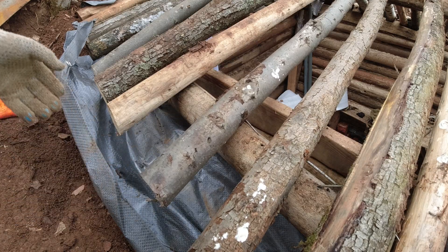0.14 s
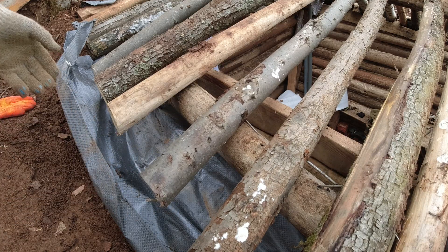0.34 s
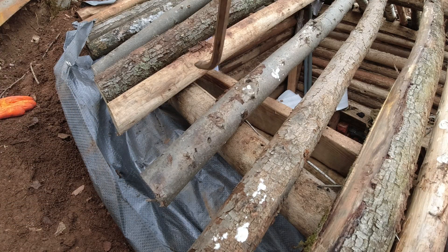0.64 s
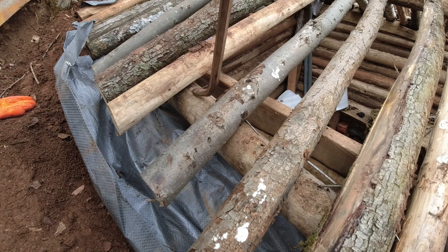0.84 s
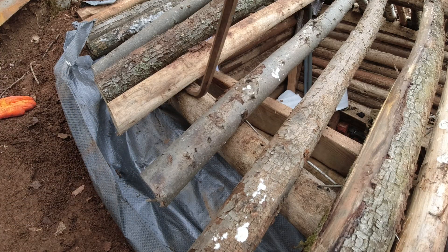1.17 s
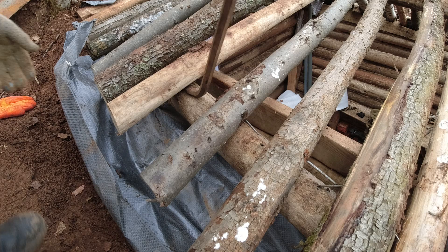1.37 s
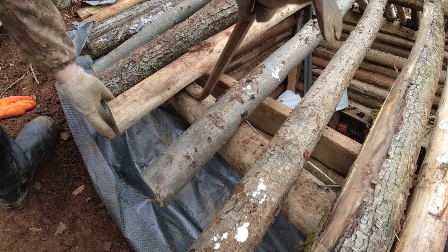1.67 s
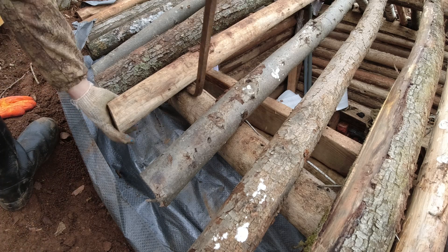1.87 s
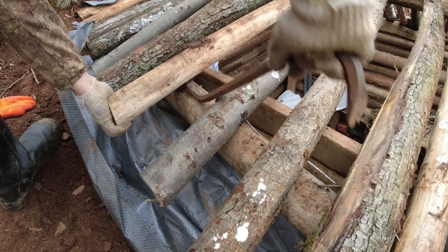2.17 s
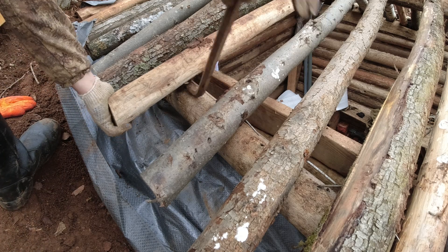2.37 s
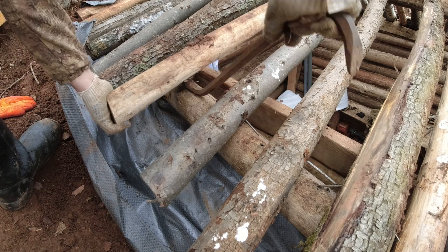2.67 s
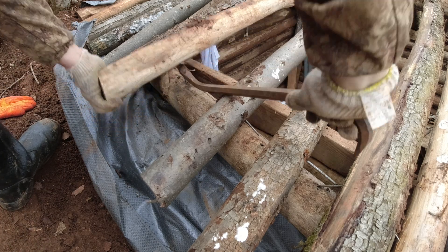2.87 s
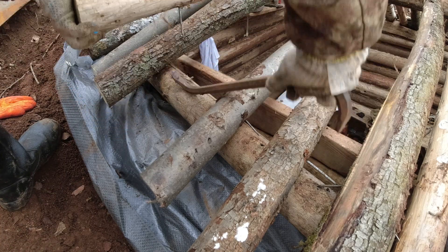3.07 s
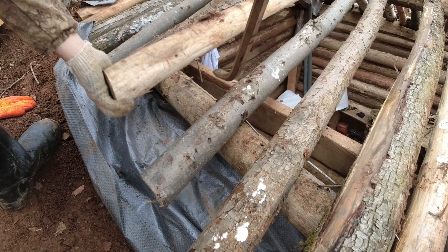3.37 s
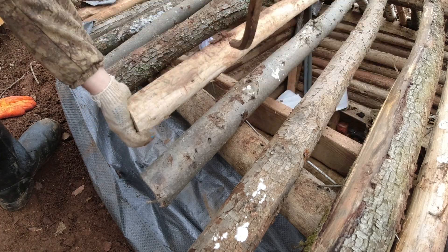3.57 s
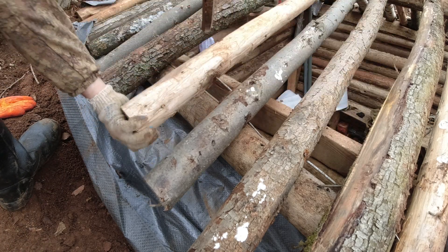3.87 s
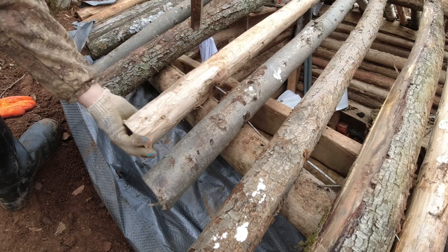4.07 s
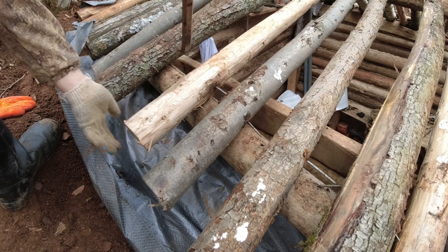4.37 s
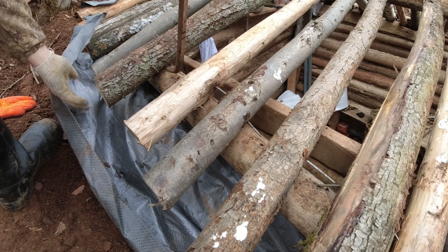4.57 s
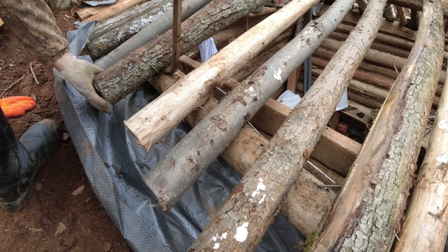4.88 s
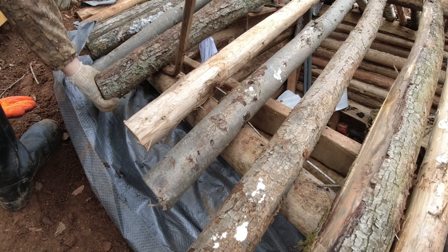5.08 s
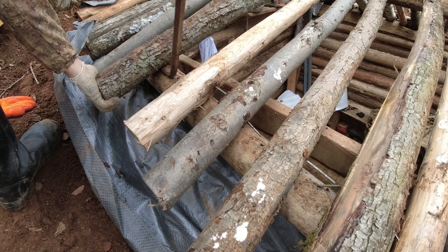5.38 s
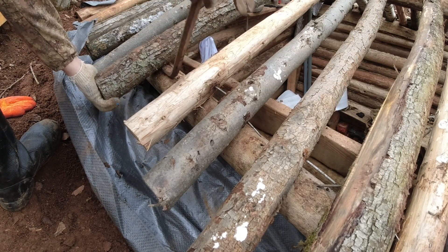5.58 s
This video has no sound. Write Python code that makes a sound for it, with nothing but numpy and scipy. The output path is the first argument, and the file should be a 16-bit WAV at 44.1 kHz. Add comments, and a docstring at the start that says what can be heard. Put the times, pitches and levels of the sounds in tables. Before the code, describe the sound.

A steel crowbar scrapes into a log frame, wood fibres crack sharply, a pole breaks loose, knocks on logs and is laid down with rustling.

```python
"""Outdoors at a log frame, close to a small microphone: a steel crowbar levers a wooden pole off.
The claw scrapes in, fibres crack, the pole breaks loose, knocks on the logs and is laid down.
Wood and steel ring as decaying modes; fibres snap as runs of tiny breaks; sliding is filtered grit.
Boots thud on the soil as low decaying sines; gloves, bark and a plastic tarp rustle; faint hiss lies below."""
import sys
import numpy as np
from scipy import signal
from scipy.io import wavfile
from scipy.ndimage import uniform_filter1d

SR = 44100
rng = np.random.default_rng(int(sys.argv[2]) if len(sys.argv) > 2 else 0)


def transcribe(signal):
    """Save signal, clipped to [-1, 1], as a 16-bit WAV file at the path in sys.argv[1]."""
    frames = np.atleast_2d(signal).T
    limited = np.clip(frames, -1, 1)
    pcm = np.round(limited * 32767).astype(np.int16)
    wavfile.write(sys.argv[1], SR, pcm)


N = 252693
TIME = np.arange(N) / SR
HIT = np.arange(16384) / SR  # time axis of one event [s]
HIT_HZ = np.fft.rfftfreq(len(HIT), 1 / SR)


def amp(db):
    """Decibels to gain."""
    return 10 ** (np.asarray(db) / 20)


def evened(x):
    """Scales to rms 1."""
    return x / np.sqrt(np.mean(x ** 2) + 1e-20)


def blow(x):
    """Scales to the energy of 10 ms at rms 1."""
    return x / np.sqrt(np.sum(x ** 2) / (SR / 100) + 1e-20)


def shape(points, hz):
    """Gain of a spectrum table at the given frequencies, interpolated over log frequency."""
    point_hz, db = np.transpose(points)
    return amp(np.interp(np.log(hz + 1), np.log(point_hz), db))


def causal(x, gain):
    """Filters by a gain curve with minimum phase, so that nothing comes before an attack."""
    both_sides = np.r_[gain, gain[-2:0:-1]]
    log_gain = np.log(np.maximum(both_sides, 1e-5))
    spectrum = np.exp(np.conj(signal.hilbert(log_gain)))
    taps = np.fft.ifft(spectrum).real[:4096]
    return signal.fftconvolve(x, taps)[:len(x)]


def colour(x, points):
    """Filters x by a spectrum table."""
    return causal(x, shape(points, HIT_HZ))


def add(mix, s, sound):
    """Adds a sound at time s, in place."""
    part = mix[max(round(s * SR), 0):][:len(sound)]
    part += sound[:len(part)]


def swell(start, length, rise_s, fall_db_per_s):
    """Envelope of one effort: it builds, holds to the end of its length and dies away."""
    rise = np.clip((TIME - start) / rise_s, 0, 1)
    return rise * amp(-fall_db_per_s * np.maximum(TIME - start - length, 0))


def scatter(t60_s, slope):
    """Dense random ringing; t60 holds up to 1 kHz and shortens toward the treble."""
    hz, t, cells = signal.stft(rng.choice([-1., 1.], len(HIT)), SR, nperseg=128)
    life_s = t60_s / np.maximum(hz[:, None] / 1000, 1) ** slope
    return signal.istft(cells * amp(-60 * t / life_s), SR, nperseg=128)[1][:len(HIT)]


def ring(modes, weight, freedom):
    """Sum of decaying sines, each of random sign as the point of contact sets it."""
    hz, db, t60_s = np.transpose(modes)[:, :, None]
    sign = rng.choice([-1, 1], hz.shape)
    envelope = amp(db - 60 * HIT / (t60_s * freedom))
    return (sign * weight(hz) * envelope * np.sin(2 * np.pi * hz * HIT)).sum(0)


def grit(grains_per_s, spread_db, count=30):
    """Tiny slips of uneven size, each ringing a few cycles at the pitch of its own spot."""
    out, t = np.zeros(N), HIT[:600]
    for hz in np.geomspace(300, 14000, count):
        size = amp(spread_db * np.minimum(rng.exponential(1, N), 3))
        slips = size * (rng.random(N) < grains_per_s / count / SR)
        spot = np.cos(2 * np.pi * hz * t) * np.exp(-t * hz / rng.uniform(1, 3))
        out += signal.oaconvolve(slips, np.sqrt(hz) * blow(spot))[:N]
    return evened(out)


# blows on timber: (time [s], level [dB], bass edge [Hz], hardness [Hz], pole level before trim [dB])
TIMBER_BLOWS = [(0.879, -37, 69, 670, -14), (1.043, -41, 149, 856, -9), (1.12, -32.5, 191, 1510, -6),
                (1.227, -23.5, 60, 460, -14), (1.234, -26.5, 450, 830, -5), (1.481, -44.5, 200, 560, -27),
                (1.8184, -23, 364, 1600, -3.5), (2.2566, -16.5, 587, 1980, -3),
                (2.5676, -16.5, 450, 1290, -8), (2.741, -24.5, 270, 1160, -1), (2.934, -39, 199, 475, -9.5),
                (3.2127, -19.5, 330, 780, -0.5), (3.2436, -25, 470, 580, 4), (3.695, -41, 218.3, 748, 17),
                (3.799, -54.5, 303, 722, -1), (4.013, -36.5, 245, 915, -3), (4.1117, -18.5, 100, 756, -5.5),
                (4.154, -35.5, 300, 900, -2), (4.184, -26, 180, 870, -2.5), (4.196, -31, 300, 990, 2),
                (4.223, -31, 296, 680, 5), (4.432, -39, 654, 950, -9), (4.7876, -23, 150.3, 820, -6),
                (4.897, -41, 198, 990, -11), (5.034, -37.5, 79, 820, -6.5)]
# pole modes: (frequency [Hz], relative level [dB], t60 before freedom [s])
POLE_MODES = [(260.7, -14, 0.3), (362, -15, 0.06), (385, -12.5, 0.13), (418.7, -9, 0.079),
              (448.3, -5.5, 0.18), (586.3, -0.5, 0.096), (668, -11.5, 0.085), (760.5, -3, 0.095),
              (886, -14.5, .11), (978, -6.5, 0.18), (1267, -8, 0.13), (1410, -14.5, 0.11), (2380, 2, 0.067),
              (2953, -11, .05)]
# timber spectrum: (frequency [Hz], gain [dB])
TIMBER_SPECTRUM = [(100, 8), (550, -4.5), (1000, -1), (1700, -3.5), (2200, -1.5), (2700, -2), (3500, -1),
                   (5000, 0.5), (9000, -11.5), (15000, 3.5)]
# hold on the pole: pinned to the frame, loose on the claw, swinging free in the glove, laid on the logs:
# (from time [s], stack t60 up to 1 kHz [s], pole freedom [factor on t60])
POLE_SUPPORT = [(0, .155, 1.17), (2.65, 0.1, 0.68), (3.45, 0.11, 1.27), (4.35, 0.25, 0.78)]


def knocks(push_db=-3, clatter_db=-2, pole_trim_db=2, slope=0.28, steepness=1.97):
    """A blow is a push, log-stack clatter and pole ring; soft contact takes away the treble."""
    out = np.zeros(N)
    for s, db, bass_hz, hard_hz, pole_db in TIMBER_BLOWS:
        _, stack_t60_s, freedom = POLE_SUPPORT[sum(s > row[0] for row in POLE_SUPPORT[1:])]

        def contact(hz):
            """Bass cut below bass_hz, softness above hard_hz."""
            bass_cut = hz ** 2 / np.hypot(hz ** 2, bass_hz ** 2)
            return bass_cut / np.hypot(1, (hz / hard_hz) ** steepness)

        gain = contact(HIT_HZ) * shape(TIMBER_SPECTRUM, HIT_HZ)
        push = amp(push_db) * blow(causal(signal.unit_impulse(len(HIT)), gain))
        clatter = amp(clatter_db) * blow(causal(scatter(stack_t60_s, slope), gain))
        pole = amp(pole_db + pole_trim_db) * blow(ring(POLE_MODES, contact, freedom))
        add(out, s, amp(db) * blow(push + clatter + pole))
    return out


# crackle spells, as grit shifts, strained fibres settle and bark crumbles: (start [s], length [s],
# rate [snaps/s], first and last snap level before scatter and trim [dB], treble re snap before trim [dB])
CRACKLE_SPELLS = [(0.111, 0.11, 72, -44, -46, -24), (1.902, 0.21, 48, -35.5, -53, -11.5),
                  (4.261, 0.28, 80, -35, -38.5, -30), (4.601, .4, 42, -43, -43.5, -34),
                  (5.101, 0.15, 26.3, -48.5, -44, -22)]
# range of note [Hz]
CRACKLE_NOTE_RANGE_HZ = (1250, 3170)
CRACKLE_SCATTER_DB, CRACKLE_T60_S = 9, 0.02


def crackling(count=40):
    """Faint snaps at random gaps through each spell, as rows like those of CLEAR_CRACKS."""
    rows = []
    for start, length, per_s, first_db, last_db, treble_db in CRACKLE_SPELLS:
        after = np.cumsum(rng.exponential(1, count)) / per_s
        trend_db = np.interp(after, [0, length], [first_db, last_db])
        snap_db = trend_db + CRACKLE_SCATTER_DB * rng.uniform(-1.08, 1, count)
        notes_hz = rng.uniform(*CRACKLE_NOTE_RANGE_HZ, count)
        for s, db, hz in zip(after, snap_db, notes_hz):
            if s < length:
                rows.append((start + s, db, db + treble_db, hz, CRACKLE_T60_S))
    return rows


# clearest snaps of fibres and bark: (time before delay [s], snap level before trim [dB],
# treble level before trim [dB], note of the snapping piece [Hz], snap t60 [s])
CLEAR_CRACKS = [(1.1191, -20, -71, 1840, 0.02), (1.398, -23.5, -48, 3780, 0.049),
                (1.4071, -25.5, -44.5, 1330, 0.12), (1.4454, -32.5, -72, 1310, 0.033),
                (1.7506, -16, -30.5, 4360, 0.035), (1.7637, -22.5, -41, 1360, 0.043),
                (1.7727, -20, -35, 3800, 0.036), (1.7776, -18, -44, 2120, 0.026),
                (1.785, -19.5, -39, 2080, 0.075), (1.804, -14, -37, 1450, 0.023),
                (1.8175, -10.5, -29.5, 1490, 0.034), (1.8349, -20, -34, 1390, .015),
                (1.8555, -13, -30.5, 2780, 0.045), (1.87, -14, -32.5, 2670, 0.06),
                (1.883, -17, -33.5, 2090, 0.021), (2.0064, -55, -39.5, 3350, 0.011),
                (2.179, -34, -48.5, 1370, 0.1), (2.2254, -16, -33, 2140, 0.027),
                (2.2399, -18, -38, 2960, 0.044), (2.2544, -4, -25.5, 2020, 0.013),
                (2.3438, -24.5, -41, 2880, 0.058), (2.3617, -41, -50, 1320, 0.025),
                (2.57, -14.5, -37, 1860, 0.078), (2.9416, -34, -44.5, 1260, .02),
                (3.021, -27.5, -64, 2220, 0.1), (3.0855, -19.5, -37, 2800, 0.034),
                (3.3146, -45.5, -87, 2500, .03), (3.5233, -37, -64, 2160, 0.012),
                (3.6025, -41.5, -57, 3300, .02), (3.6599, -24, -38.5, 3150, 0.023),
                (3.6675, -26, -44, 2870, 0.034), (3.687, -28, -49.5, 2650, 0.12),
                (3.8122, -37.5, -75, 2265, 0.034), (3.9353, -38.5, -83, 1560, 0.023),
                (3.9787, -29, -60, 2260, .06), (4.264, -42, -46, 1610, .01),
                (4.2973, -24.5, -55, 1210, 0.024), (4.334, -30, -63, 2850, .025),
                (4.465, -35, -76, 2170, 0.031), (4.6, -24, -46, 3020, 0.0089),
                (4.71, -32, -81, 2070, 0.057), (4.9763, -36, -77, 1960, 0.022),
                (5.3663, -37.5, -64, 1500, .011), (5.5414, -33.5, -56.5, 2310, 0.045)]
# spectra of snap and treble fizz: (frequency [Hz], gain [dB])
SNAP_SPECTRUM = [(100, -31), (500, -4.5), (1200, -2.5), (2200, -4.5), (3500, -3), (5500, -5), (8000, -22),
                 (16000, -37.5)]
FIZZ_SPECTRUM = [(1000, -42), (4000, -26.5), (6500, 10), (9000, 14.5), (16000, 4.5)]


def cracks(snap_trim_db=-12, fizz_trim_db=-1, grain_db=3, tail_db=-27, tail_t60_s=0.12,
           fizz_life=0.47, note_db=7, sharpness=5, delay_s=.0008, count=140):
    """A fibre tears in a quick run of tiny breaks that ring the loose piece; the treble dies first."""
    out, t = np.zeros(N), HIT[:4096]
    snap_gain, fizz_gain = shape(SNAP_SPECTRUM, HIT_HZ), shape(FIZZ_SPECTRUM, HIT_HZ)

    def fade(life_s):
        """Fast decay over a weak tail."""
        return amp(-60 * t / max(life_s, .003)) + amp(tail_db - 60 * t / tail_t60_s)

    sizes = amp(grain_db * np.minimum(rng.standard_normal((count, len(t))), 2))
    runs = sizes * rng.choice([-1, 1], (count, len(t)))
    for (s, snap_db, treble_db, note_hz, t60_s), breaks in zip(list(CLEAR_CRACKS) + crackling(), runs):
        snap = causal(breaks * fade(t60_s), snap_gain)
        note = signal.lfilter(*signal.iirpeak(note_hz, sharpness, SR), snap)
        snap = amp(snap_db + snap_trim_db) * blow(snap + amp(note_db) * note)
        fizz = causal(breaks * fade(t60_s * fizz_life), fizz_gain)
        fizz = amp(treble_db + fizz_trim_db) * blow(fizz)
        add(out, s + delay_s, snap + fizz)
    return out


# blows on the crowbar: (time [s], level [dB], frequency excited most [Hz], spread [octaves],
# freedom to ring [factor on t60])
BAR_BLOWS = [(.897, -42.5, 2050, 0.61, 1), (1.121, -41, 2060, 0.95, 0.66), (1.857, -30, 4550, 1.15, 0.16),
             (2.256, -29, 2100, 1.9, 0.45), (2.568, -12.5, 870, 1.3, 0.47), (2.571, -18, 1983, 1.2, 0.36),
             (2.741, -31, 760, 0.48, 0.41), (3.084, -30, 5660, 1.23, 0.58), (3.085, -34, 2460, 0.31, 0.94),
             (3.213, -30, 606, 0.39, 0.94)]
# crowbar modes: (frequency [Hz], relative level [dB], t60 before freedom [s])
BAR_MODES = [(685, -17, .4), (715, 0, .34), (995, 0, .22), (1147, -18, .34), (1260, -2, .22),
             (1595, -9, .18), (1878, 0, .22), (2837, -14, .22), (3424, -7, .1), (4006, -6, .15),
             (4657, -9, .09), (5476, -2, .12), (6578, -6, .1), (7890, -4, .12), (9500, -12, .1),
             (12400, -15, .1)]


def crowbar(rise_s=0.0017):
    """Bending modes of the steel, damped by the glove and by the wood that it leans on."""
    out = np.zeros(N)
    for s, db, centre_hz, octaves, freedom in BAR_BLOWS:
        def contact(hz):
            """Weight falling away on both sides of centre_hz."""
            return 1 / (1 + (np.log2(hz / centre_hz) / octaves) ** 2) ** 1.28

        steel = ring(BAR_MODES, contact, freedom) * (1 - np.exp(-HIT / rise_s))
        add(out, s, amp(db) * blow(steel))
    return out


# gritty shoves of claw, pole or boot: (start [s], length [s], peak level [dB], centre [Hz])
GRITTY_SHOVES = [(0.099, 0.072, -49, 690), (0.172, 0.027, -48.5, 1100), (1.063, 0.085, -37, 2650),
                 (1.341, 0.036, -34.5, 1200), (1.715, 0.043, -44.5, 463), (2.195, 0.038, -48.5, 2800),
                 (2.31, 0.064, -41.5, 894), (2.664, 0.039, -45.5, 930), (2.713, 0.052, -42, 627),
                 (3.01, 0.027, -42.5, 5000), (3.981, 0.045, -45.5, 2120), (4.286, 0.091, -45.5, 1800),
                 (4.607, 0.059, -42.5, 2320), (5.297, 0.031, -48.5, 1200)]
SHOVE_OCTAVES = 1.2


def shoves(crest=0.64):
    """Friction builds until the crest, a fraction of the length, then falls to nothing."""
    out, drive = np.zeros(N), grit(grains_per_s=2100, spread_db=-0.5)
    for s, length, db, centre_hz in GRITTY_SHOVES:
        band = 1 / (1 + (np.log2((HIT_HZ + 1) / centre_hz) / SHOVE_OCTAVES) ** 2) ** 1.97
        rasp = evened(causal(drive[round(s * SR):][:len(HIT)], band))
        effort = np.interp(HIT, [0, length * crest, length], [.15, 1, 0])
        add(out, s, amp(db) * rasp * effort)
    return out


# spectra of wood body and surface rasp: (frequency [Hz], gain [dB])
BODY_SPECTRUM = [(80, -17.5), (220, -1), (500, 2), (1200, -1.5), (1800, -7), (3000, -30), (8000, -54)]
RASP_SPECTRUM = [(500, -41), (1200, -6.5), (2000, -0.5), (3300, 1.5), (5500, -7.5), (8000, -9.5),
                 (16000, -33)]
STROKE_RISE_S, STROKE_RELEASE_DB_PER_S = 0.024, 230.5


def rubbing(strokes, trims_db, drive):
    """Grit heard as the body of the wood, the rasp of its surface and a fine fizz."""
    power = 0
    for start, length, *levels_db in strokes:
        envelope = swell(start, length, STROKE_RISE_S, STROKE_RELEASE_DB_PER_S)
        power = power + np.outer(amp(levels_db), envelope) ** 2
    bands = (BODY_SPECTRUM, RASP_SPECTRUM, FIZZ_SPECTRUM)
    return sum(evened(colour(drive, band)) * gain * amp(trim_db)
               for band, gain, trim_db in zip(bands, np.sqrt(power), trims_db))


def singing(scrape, steel_db=-5, freedom=1.7):
    """The sliding claw keeps the bar's modes faintly ringing."""
    steel = ring(BAR_MODES, np.ones_like, freedom)
    sung = evened(signal.fftconvolve(scrape, steel)[:N])
    return scrape + amp(steel_db) * np.std(scrape) * sung


# steel and sleeve sliding on wood: (start [s], length [s], body, rasp and fizz levels before trim [dB])
SCRAPE_STROKES = [(.87, 0.087, -89, -53, -65), (1.04, 0.15, -50, -63, -78), (1.27, 0.12, -48, -56.5, -73),
                  (1.49, 0.086, -70.5, -51.5, -70.5), (1.86, 0.063, -53.5, -51.5, -54.5),
                  (2.3, .08, -51.5, -68.5, -74), (2.72, 0.31, -58.5, -61.5, -76),
                  (2.93, 0.12, -50, -53, -59.5), (3.08, 0.1, -56.5, -56.5, -88)]


def scrapes():
    """Dense grit and noise, shaped by each stroke, with the bar singing along."""
    sliding = grit(grains_per_s=6400, spread_db=1.5) + amp(4.0) * rng.standard_normal(N)
    return singing(rubbing(SCRAPE_STROKES, trims_db=(-1, 0, 3), drive=sliding))


def catching(depth_db, size=500):
    """Rough bark catches and lets go, so friction comes in clumps."""
    drift = uniform_filter1d(uniform_filter1d(rng.standard_normal(N), size), size // 2)
    return amp(depth_db * evened(drift))


# handfuls of glove, bark and tarp: (start [s], length [s], body, rasp and fizz levels before trim [dB])
RUSTLE_HANDFULS = [(3.99, .1, -50, -60.5, -85), (4.08, .27, -51, -55, -63), (4.36, 0.39, -61, -56.5, -70),
                   (4.81, .14, -54.5, -53, -63.5), (5.02, 0.33, -65, -63.5, -71.5),
                   (5.45, .08, -61, -68, -87), (5.53, 0.079, -53, -57.5, -62.5),
                   (5.67, 0.069, -60, -75, -82)]


def rustles():
    """Sparse, very uneven grit and noise in clumps, shaped by each handful."""
    crinkling = grit(grains_per_s=1500, spread_db=7) + amp(0.5) * rng.standard_normal(N)
    return rubbing(RUSTLE_HANDFULS, trims_db=(1, 3, 4), drive=crinkling * catching(depth_db=2))


# boots and weight on the ground: (time [s], level before onset and decay [dB], frequency [Hz], t60 [s])
GROUND_THUDS = [(0.122, -25, 73.5, 0.18), (.154, -16, 81, 0.084), (1.122, -23.5, 56.4, 0.09),
                (1.226, -19, 70.4, 0.053), (5.036, -35.5, 171.4, 0.21)]
# weight bearing on soil and frame: (start [s], length [s], level before trim [dB])
GROUND_LOADS = [(0, .1, -53), (0.134, 0.081, -35), (0.871, 0.078, -33.5), (1.081, .24, -34),
                (1.752, 0.13, -40), (2.25, 0.21, -45.5), (2.564, 0.12, -48.5), (2.72, 0.032, -39),
                (2.926, 0.11, -45), (3.21, 0.13, -50), (3.656, 0.052, -48), (3.99, 0.12, -46),
                (4.093, 0.068, -31), (4.567, 0.088, -39), (4.692, .13, -35), (4.958, 0.064, -38.5),
                (5.54, 0.16, -55.5)]
# ground spectrum: (frequency [Hz], gain [dB])
GROUND_SPECTRUM = [(10, -13), (28, 2.5), (43, -1), (60, -10), (82, -4), (110, -15), (150, -20),
                   (230, -36.5), (1000, -76)]
LOAD_RISE_S, SETTLE_DB_PER_S, REST_BEFORE_TRIM_DB = 0.013, 99, -69


def ground(rumble_trim_db=-2, rise_s=0.0004):
    """Footfalls and shifting weight shake the soil and the frame, which then settle."""
    out = evened(colour(rng.standard_normal(N), GROUND_SPECTRUM))
    out /= np.sqrt(uniform_filter1d(out ** 2, size=3000) + 0.076)  # levels out slow swings
    power = sum((amp(db) * swell(start, length, LOAD_RISE_S, SETTLE_DB_PER_S)) ** 2
                for start, length, db in GROUND_LOADS)
    out *= amp(rumble_trim_db) * np.sqrt(power + amp(REST_BEFORE_TRIM_DB) ** 2)
    for s, db, hz, t60_s in GROUND_THUDS:
        envelope = amp(db - 60 * HIT / t60_s) * (1 - np.exp(-HIT / rise_s))
        add(out, s, envelope * np.sin(2 * np.pi * hz * HIT))
    return out


def yard(x, wet_db=-31, t60_s=0.16):
    """Open air: only a faint, short scatter from the ground and the log stack."""
    tail = scatter(t60_s, slope=0.11)
    return x + amp(wet_db) * signal.fftconvolve(x, tail / np.linalg.norm(tail))[:N]


# hiss spectrum: (frequency [Hz], gain [dB])
AIR_SPECTRUM = [(20, 16), (120, -4), (250, -5.5), (500, -6.5), (1200, -5), (3300, -5), (4400, 0.5),
                (5600, -8.5), (6900, 1.5), (8500, -16.5), (11000, -12), (16000, -13)]
# hiss level: (time [s], level [dB])
AIR_CURVE = [(0, -56.5), (.8, -59.5), (1.6, -55), (2.5, -63), (3.401, -69.5), (3.899, -65.5), (5.73, -63.5)]


def air():
    """Outdoor hiss: coloured noise under a slow level curve."""
    s, db = np.transpose(AIR_CURVE)
    return evened(colour(rng.standard_normal(N), AIR_SPECTRUM)) * amp(np.interp(TIME, s, db))


def scene():
    """All the work at the frame, over the outdoor hiss."""
    work = knocks() + cracks() + crowbar() + shoves() + scrapes() + rustles()
    return (yard(work) + ground() + air())[None]


# microphone response: (frequency [Hz], gain [dB])
MICROPHONE_RESPONSE = [(2800, -2), (3750, -2), (4500, -13.5), (5600, -5), (7000, -14.5), (8400, -3.5),
                       (10500, -13.5), (13000, -14), (16000, -35.5)]


def record(dry):
    """The microphone's port ripples the treble; then the band limit at 16 kHz."""
    heard = colour(dry[0], MICROPHONE_RESPONSE)
    band_limit = signal.firwin(511, 16000, window=("kaiser", 9), fs=SR)
    return signal.oaconvolve(heard, band_limit, "same")[None]


dry = scene()
out = record(dry)
transcribe(out)
```